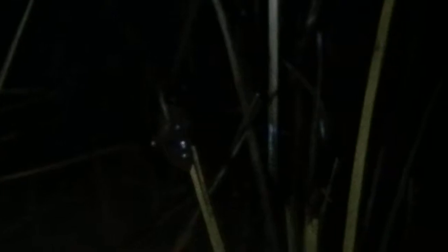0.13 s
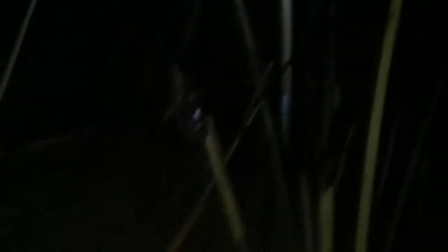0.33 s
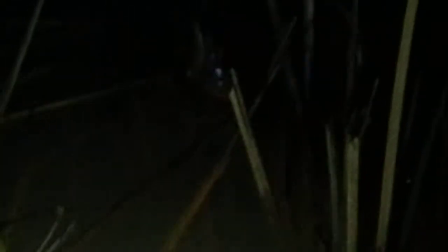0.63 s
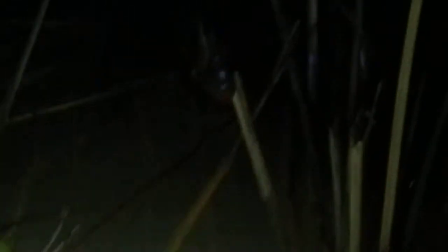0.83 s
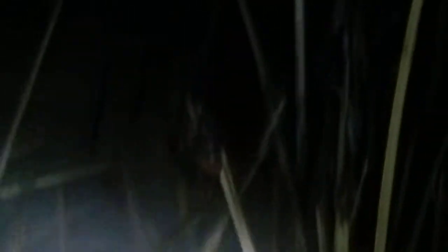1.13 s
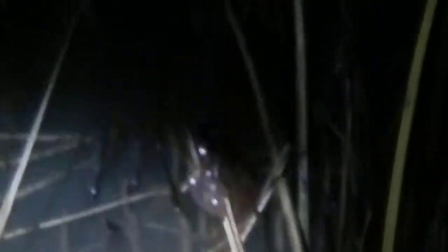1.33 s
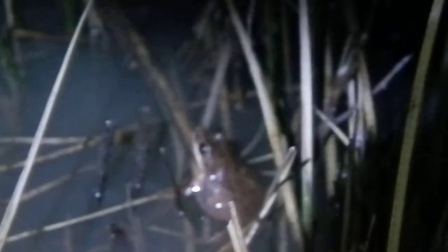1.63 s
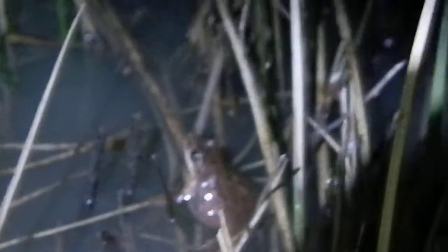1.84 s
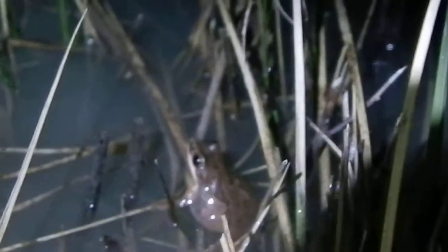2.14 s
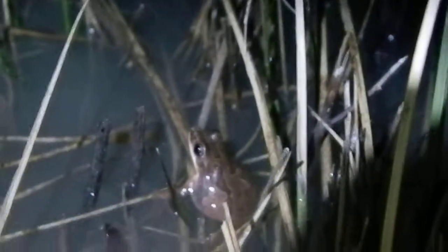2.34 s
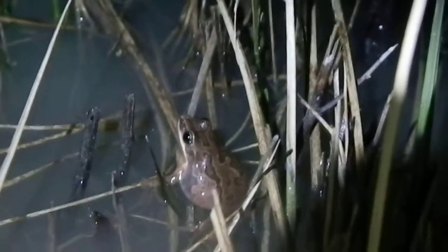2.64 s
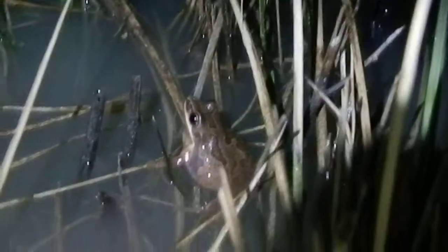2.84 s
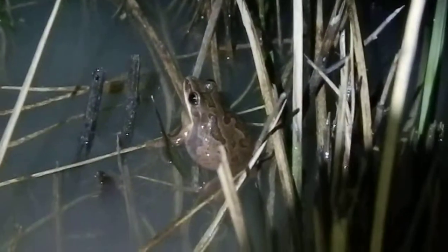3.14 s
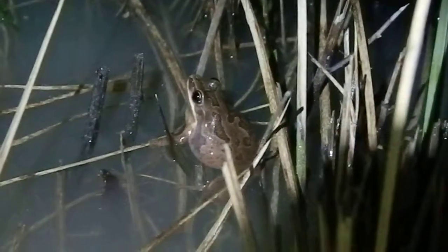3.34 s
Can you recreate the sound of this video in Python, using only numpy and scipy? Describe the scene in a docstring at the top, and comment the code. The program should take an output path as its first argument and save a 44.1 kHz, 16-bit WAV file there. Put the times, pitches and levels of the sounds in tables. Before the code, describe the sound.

Two close frogs creak in turn, with distant frogs and a faint cricket.

```python
"""Chorus frogs at a night pond.

Two close frogs take turns among reeds. Each call is a train of ringing pulses that slows, swells and
climbs in pitch, like a thumb along a comb. More frogs creak and whistle across the water, a cricket
trills on the bank with its wings, and a far rumble with a faint hum lies underneath."""
import sys
import numpy as np
from scipy import signal
from scipy.fft import rfft, irfft
from scipy.io import wavfile

SR = 44100
rng = np.random.default_rng(int(sys.argv[2]) if len(sys.argv) > 2 else 0)


def wav_out(sig):
    """Save sig, one row per channel (or a flat mono array), as 16-bit PCM at SR to the path in sys.argv[1]."""
    wavfile.write(sys.argv[1], SR, np.round(np.clip(np.atleast_2d(sig).T, -1, 1) * 32767).astype(np.int16))


N = 153027

# far rumble spectrum: f/Hz, relative density/dB
RUMBLE_SPECTRUM = [(15, -57.5), (25, -37.5), (75, -1), (91, -0.5), (150, -3.5), (257, -15.5), (300, -17),
                   (367, -6.5), (409, -5.5), (448, -8.5), (556, -13.5), (701, -19.5), (1000, -23),
                   (1300, -40.5), (2200, -120)]
# night air spectrum: f/Hz, relative density/dB
AIR_SPECTRUM = [(700, -16), (1000, -4.5), (1300, 2), (2050, -5), (2800, 4), (3350, -4), (3700, -9.5),
                (4200, -6), (4650, -2), (5050, -12), (7000, -17), (11000, -19.5), (15500, -22)]
# stereo likeness of the noise: f/Hz, left-right coherence
COHERENCE = [(60, 1), (200, 0.82), (400, 0.8), (700, 0.39), (1300, 0.26), (2800, 0.24), (4500, 0.045),
             (5800, -0.19), (8000, -0.47), (15000, -0.11)]
# hum tones: f/Hz, rms level/dB
HUM_TONES = [(96, -55.5), (416, -61), (566, -67.5), (15735, -88)]
# far whistles: t/s, length/s, first f/Hz, last f/Hz, source level/dB
FAR_WHISTLES = [(0.288, 0.14, 2570, 2870, -48), (0.797, 0.11, 3098, 3255, -36.5),
                (.98, .11, 2950, 3133, -45), (1.532, 0.11, 2360, 2470, -45.5),
                (1.581, 0.11, 2770, 3050, -50), (2.182, 0.12, 2810, 3064, -50),
                (2.461, 0.12, 2943, 3270, -38), (2.449, 0.15, 2740, 3020, -37.5),
                (2.67, .11, 3046, 3234, -41.5), (3.091, 0.08, 2680, 2857, -44.5)]
# far creaks: t/s, length/s, first f/Hz, last f/Hz, source level/dB, left minus right/dB
FAR_CREAKS = [(.42, 0.42, 2850, 3350, -32.5, -1), (1.501, .3, 2460, 2600, -38, -6),
              (1.801, .66, 2730, 3210, -32, -5)]
# near calls: t/s, pulse count, gain/dB, pitch shift/Hz, last pulse gain/dB, 6 gaps/ms at even stages
LOW_FROG_CALLS = [(.3801, 24, .5, 10, -8, 23.1, 22.6, 23.7, 27.2, 33.6, 36.4),
                  (1.8356, 24, -.5, 0, -1, 23.8, 22.5, 23.9, 26.6, 33.0, 36.0),
                  (3.2707, 24, 1.5, 10, -1, 23.9, 22.6, 24.0, 27.0, 32.0, 37.0)]
HIGH_FROG_CALLS = [(-.3631, 27, -.3, 50, -2, 20.0, 20.5, 22.5, 26.0, 34.9, 26.7),
                   (1.1076, 27, .5, 0, -2, 20.5, 20.0, 22.1, 24.8, 30.2, 29.8),
                   (2.5652, 26, -.3, 10, -2, 20.0, 19.9, 22.0, 25.2, 30.2, 30.9)]
# pulses along a call: progress 0-1, f/Hz, level/dB, ring/ms, undertone gain/dB, undertone half-width/ms
LOW_FROG_COURSE = [(0, 2350, -36, 1.7, -11, .4), (.2, 2380, -29, 0.78, -13.5, 0.46),
                   (.42, 2565, -22.5, 3.1, -14.5, 0.31), (.6, 2675, -20, 1.8, -14, 0.42),
                   (.75, 2760, -18, 1.3, -15.5, 0.52), (.88, 2802, -20, 1.85, -10.5, 0.31),
                   (1, 2840, -23.5, 1.5, -11, 0.52)]
HIGH_FROG_COURSE = [(0, 2600, -40.5, 1.1, -7, 0.19), (0.201, 2710, -31, 1.2, -8, 0.37),
                    (0.422, 2833, -24.5, 1.9, -13, 0.31), (.6, 3007, -20.5, 2, -16.5, 0.53),
                    (.8, 3152, -19, 1.5, -16.5, 0.74), (.93, 3245, -18.5, 1.43, -16, 1),
                    (1, 3223, -20.5, 1.45, -12.5, 1.0)]
# stereo balance of the near frogs: f/Hz, left minus right/dB
NEAR_BALANCE = [(1400, 0), (2300, 8.5), (2580, 7), (2800, 2.5), (3000, 3), (3250, 0), (3500, -10.5)]
# echoes off reeds and water: delay/ms, gain/dB
REED_ECHOES = [(4.6, -22.5), (6.1, -26.5), (10.2, -28.5)]


def amp(db):
    """Decibels to gain."""
    return 10 ** (np.asarray(db) / 20)


def unit_rms(x):
    """Scale to rms 1."""
    return x / np.sqrt(np.mean(x ** 2) + 1e-20)


def curve_at(points, hz):
    """Interpolate on a log-frequency axis."""
    f, value = np.transpose(points)
    return np.interp(np.log(hz + 1), np.log(f + 1), value)


def add(mix, start_s, sound):
    """Mix in a sound, cut at the end; skip it if it starts before zero."""
    if start_s >= 0:
        part = mix[round(start_s * SR):][:len(sound)]
        part += sound[:len(part)]


def pan(db):
    """Stereo gains for a left-minus-right level."""
    return amp(np.array([[.5], [-.5]]) * db)


def drift(rate_hz):
    """Smooth random wander, rms 1."""
    f = np.fft.rfftfreq(N, 1 / SR)
    return unit_rms(irfft(rfft(rng.standard_normal(N)) * np.exp(-(f / rate_hz) ** 2), N))


def pond_reverb(x, t60_s):
    """Scatter from reeds and banks: a dying tail, partly shared by the channels."""
    t = np.arange(SR // 2) / SR
    tail = rng.standard_normal((2, len(t))) * amp(-60 * t / t60_s) * np.clip(t / .006, 0, 1)
    tail = tail + .48 * tail[::-1]
    tail /= np.linalg.norm(tail, axis=1, keepdims=True)
    return signal.fftconvolve(np.atleast_2d(x), tail, axes=1)[:, :N]


def stereo_noise(spectrum):
    """Coloured noise, rms 1: centred bass, wide treble."""
    f = np.fft.rfftfreq(N, 1 / SR)
    mid, side = rfft(rng.standard_normal((2, N))) * amp(curve_at(spectrum, f))
    coherence = curve_at(COHERENCE, f)
    mid, side = mid * np.sqrt(1 + coherence), side * np.sqrt(1 - coherence)
    return unit_rms(irfft(np.array([mid + side, mid - side]), N))


def background(rumble_db=-45, swell_db=.6, air_db=-49.5, waver_db=1, waver_rad=1.38):
    """Far rumble, night air and a faint wavering hum."""
    t = np.arange(N) / SR
    hum = np.zeros(N)
    for hz, db in HUM_TONES:
        peak = np.sqrt(2) * amp(db + waver_db * drift(1))
        hum += peak * np.sin(2 * np.pi * hz * t + waver_rad * drift(3.9))
    rumble = amp(rumble_db + swell_db * drift(3.8)) * stereo_noise(RUMBLE_SPECTRUM)
    return rumble + amp(air_db) * stereo_noise(AIR_SPECTRUM) + hum


def cricket(first_s=.154, period_s=.0378, stroke_s=.025, top_hz=4720, fall_hz=825, db=-47, wet_db=-8):
    """One chirp per wing stroke; the pitch falls as the wings slow."""
    trill = np.zeros(N)
    progress = np.linspace(0, 1, round(stroke_s * SR))
    envelope = abs(np.sin(np.pi * progress ** 1.01)) ** 1.22
    for start_s in np.arange(first_s, N / SR, period_s):
        jitter_hz, jitter_s, jitter_db = rng.standard_normal(3) * (35, .001, .02)
        hz = top_hz + jitter_hz - fall_hz * progress ** 2.26
        chirp = envelope * np.sin(2 * np.pi * np.cumsum(hz) / SR)
        add(trill, start_s + jitter_s, amp(db + jitter_db) * chirp)
    trill *= 1 + .25 * drift(250)  # uneven teeth of the wing's file
    return trill * pan(2.5) + amp(wet_db) * pond_reverb(trill, t60_s=.07)


def whistle(length_s, first_hz, last_hz, db):
    """A frog's short rising whistle, fluttering in strength."""
    progress = np.linspace(0, 1, round(length_s * SR))
    hz = first_hz + (last_hz - first_hz) * progress ** .754
    envelope = np.sqrt(abs(np.sin(np.pi * progress)))
    flutter = 1 + .4 * np.interp(progress, np.linspace(0, 1, 24), rng.standard_normal(24))
    return amp(db) * envelope * flutter * np.sin(2 * np.pi * np.cumsum(hz) / SR)


def chorus(count=80, middle_hz=2920, spread_hz=240, rise_hz=230, length_s=.13, db=-44.5):
    """Many whistling frogs, scattered in time, pitch and level."""
    out = np.zeros(N)
    for k, (timing, pitch, strength) in enumerate(rng.uniform(-1, 1, (count, 3))):
        start_s = (k + timing / 2) / count * N / SR
        hz = middle_hz + spread_hz * pitch
        add(out, start_s, whistle(length_s, hz - rise_hz / 2, hz + rise_hz / 2, db + 2 * strength))
    return out


def larynx_pulse(hz, ring_ms, under_db, under_ms):
    """One snap of the larynx: the vocal sac swells into a tone and rings out over a short undertone."""
    swell_ms = 2.47
    sag, sag_ms = .016, .35  # pitch starts high and settles
    under_ratio, under_at_ms = .52, 1.18
    snap_db, snap_ms = -35, .53
    ms = np.arange(700) * 1000 / SR
    phase = 2 * np.pi * np.cumsum(hz * (1 + sag * np.exp(-ms / sag_ms))) / SR
    swell = np.sin(np.pi / 2 * np.minimum(ms / swell_ms, 1)) ** 2
    past_swell_ms = np.logaddexp(0, 2 * (ms - swell_ms)) / 2  # soft knee
    envelope = swell * np.exp(-past_swell_ms / ring_ms)
    tone = envelope / envelope.max() * np.sin(phase)
    under_envelope = np.exp(-((ms - under_at_ms) / under_ms) ** 2 / 2) * np.minimum(2 * ms, 1)
    undertone = under_envelope * np.sin(under_ratio * phase)
    snap = rng.standard_normal(len(ms)) * np.exp(-ms / snap_ms)
    return tone + amp(under_db) * undertone + amp(snap_db) * snap


def creak(start_s, length_s, first_hz, last_hz, db, pan_db):
    """A far frog's call: pulses that slow, swell and climb."""
    first_gap_s, last_gap_s, swell_db = .019, .031, 6
    out, t = np.zeros(N), start_s
    while t < start_s + length_s:
        progress = (t - start_s) / length_s
        gain = amp(db - swell_db * (1 - progress) ** 2 + rng.standard_normal())
        hz = first_hz + (last_hz - first_hz) * progress
        add(out, t, gain * larynx_pulse(hz, ring_ms=.62, under_db=-8, under_ms=.35))
        t += first_gap_s + (last_gap_s - first_gap_s) * progress ** 2
    return out * pan(pan_db)


def far_frogs(direct_db=-3, wet_db=-4):
    """Creaks and whistles smeared by the reeds; the chorus beyond arrives as scatter only."""
    creaks = sum(creak(*row) for row in FAR_CREAKS)
    whistles = np.zeros(N)
    for start_s, *row in FAR_WHISTLES:
        add(whistles, start_s, whistle(*row))
    calls = creaks + whistles
    return amp(direct_db) * calls + amp(wet_db) * pond_reverb(calls + chorus(), t60_s=.69)


def near_frog(calls, course, lead_ms=2, jitter_db=.45, jitter_hz=8):
    """Pulse trains along one frog's course of pitch, level and ring."""
    out = np.zeros(N)
    stages, *columns = np.transpose(course)
    for start_s, count, call_db, shift_hz, last_db, *stage_gaps_ms in calls:
        gap_stages = np.linspace(0, 1, len(stage_gaps_ms))
        gaps_ms = np.interp(np.linspace(0, 1, count - 1), gap_stages, stage_gaps_ms)
        onsets_s = start_s + (np.r_[0, np.cumsum(gaps_ms)] - lead_ms) / 1000  # onset leads the peak
        for t, progress in zip(onsets_s, np.linspace(0, 1, count)):
            hz, db, *timbre = (np.interp(progress, stages, column) for column in columns)
            db += call_db + last_db * (progress == 1) + jitter_db * rng.standard_normal()
            hz += shift_hz + jitter_hz * rng.standard_normal()
            add(out, t, amp(db) * larynx_pulse(hz, *timbre))
    return out


def near_frogs(wet_db=-13):
    """Two close frogs in turn, with quick echoes off reeds and water."""
    calls = near_frog(LOW_FROG_CALLS, LOW_FROG_COURSE) + near_frog(HIGH_FROG_CALLS, HIGH_FROG_COURSE)
    f = np.fft.rfftfreq(N, 1 / SR)
    direct = irfft(rfft(calls) * pan(curve_at(NEAR_BALANCE, f)), N)
    echoes = np.zeros(N)
    for delay_ms, db in REED_ECHOES:
        add(echoes, delay_ms / 1000, amp(db) * calls)
    return direct + echoes + amp(wet_db) * pond_reverb(calls, t60_s=.14)


def scene():
    """The pond at night, in stereo."""
    return near_frogs() + far_frogs() + cricket() + background()


def record(dry):
    """Microphone switch-on after a moment, then a low-pass."""
    on_s, fade_s, cutoff_hz = .1257, .012, 16000
    fade_in = np.clip((np.arange(N) / SR - on_s) / fade_s, 0, 1)
    lowpass = signal.firwin(511, cutoff_hz, window=("kaiser", 9), fs=SR)
    return signal.oaconvolve(dry * fade_in, lowpass[None], "same")


dry = scene()
out = record(dry)
wav_out(out)
```